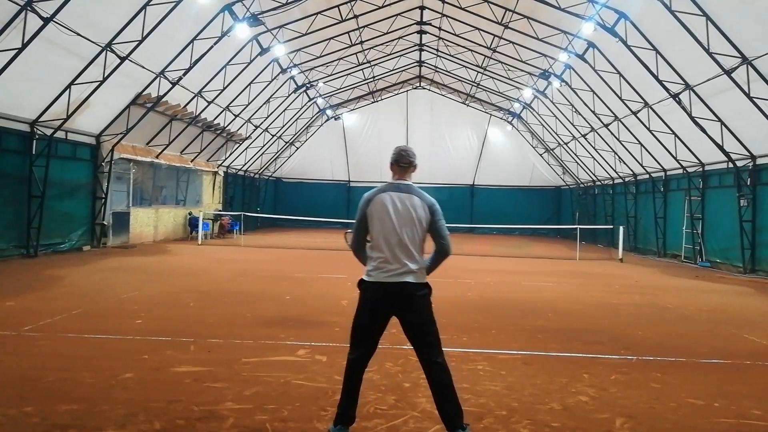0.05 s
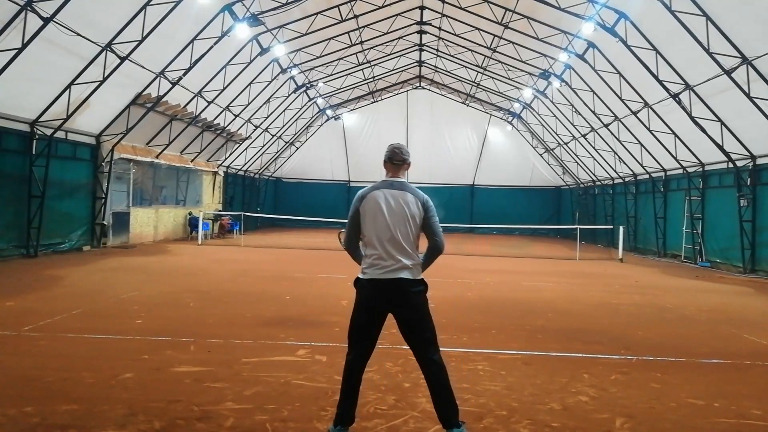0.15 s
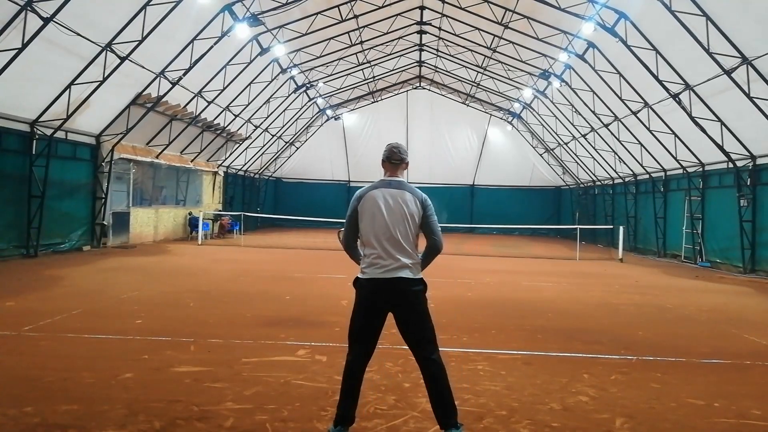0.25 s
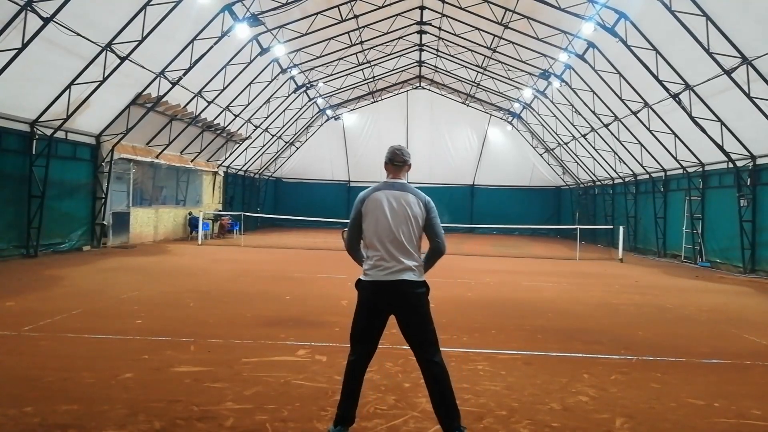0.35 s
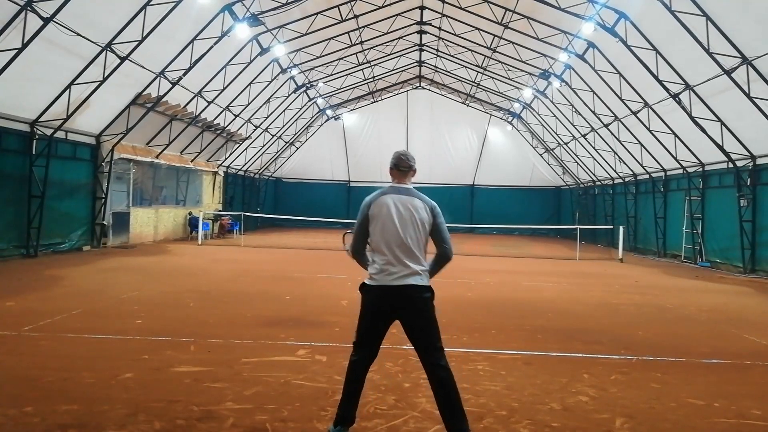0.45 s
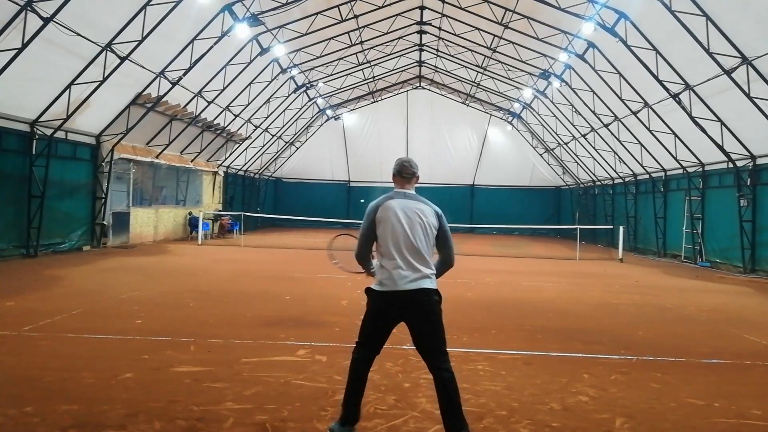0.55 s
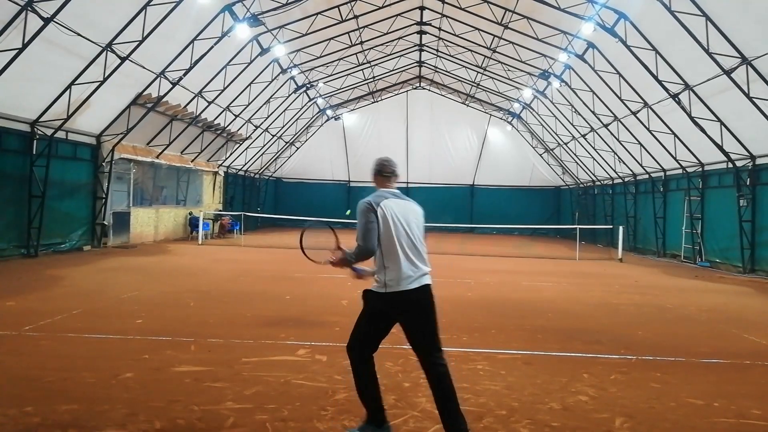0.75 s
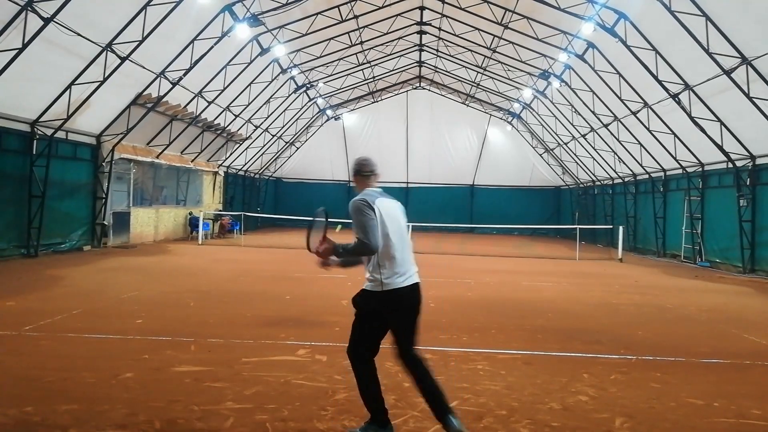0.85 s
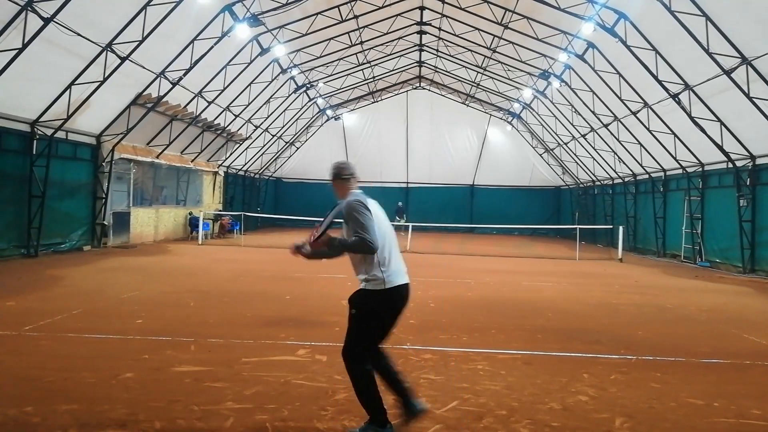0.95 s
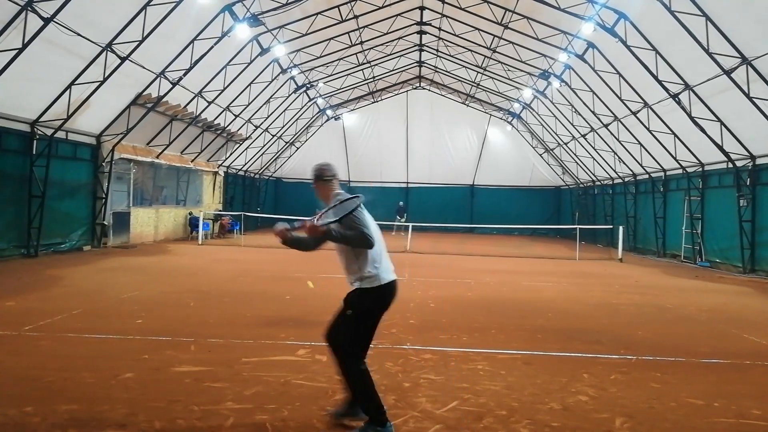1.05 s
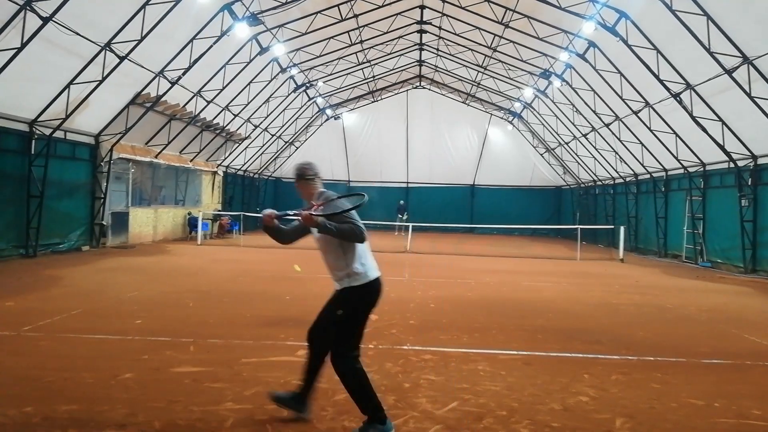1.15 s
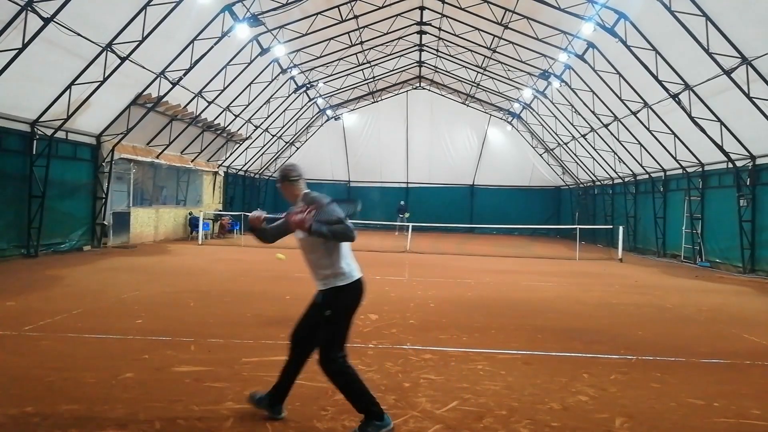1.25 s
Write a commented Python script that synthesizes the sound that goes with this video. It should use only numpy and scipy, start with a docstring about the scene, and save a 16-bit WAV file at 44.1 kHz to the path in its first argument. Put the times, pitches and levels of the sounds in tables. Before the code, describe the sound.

Tennis ball hit across a reverberant hall, long ringing echo, then shoe scuffs and a bounce

```python
"""Indoor clay tennis court under an arched roof, over a steady bed of humming lights and filtered-noise air.
Soft footfalls pad by as noise bursts, then the far player strikes the ball: damped modes give a dull pock,
and coloured noise bursts give the boom and the flutter of brighter roof echoes. A long wash of decaying
noise follows, with lingering notes, and the end wall feeds it once more. The near player's shoes scuff
the clay in noise swells, the ball bounces with a modal pop, and grains crack as a swept tone squeaks."""
import sys
import numpy as np
from scipy import signal
from scipy.fft import rfft, irfft, next_fast_len
from scipy.io import wavfile
from scipy.ndimage import map_coordinates

SR = 44100
rng = np.random.default_rng(int(sys.argv[2]) if len(sys.argv) > 2 else 0)


def to_wav(s):
    """Save 16-bit WAV."""
    ch = np.atleast_2d(s).T  # columns
    pcm = np.round(np.clip(ch, -1, 1) * 32767)  # PCM
    wavfile.write(sys.argv[1], SR, pcm.astype(np.int16))


N = 57330  # length in samples

# All spectra below give relative colour; each noise is levelled to rms 1 before its own gain.

# ball on the strings: pitch_hz, level_db, t60_s, rise_s
RACKET_MODES = [(212.3, -9.5, 0.15, 0.0091), (333.4, -2, 0.049, 0.0016), (630, 6.5, 0.013, .0012),
                (1124, 0, 0.025, 0.0031)]
# the pock, direct and off ground, walls and roof: start_s, level_db, tilt_db_per_octave, left_minus_right_db
POCK_ARRIVALS = [(0.2347, -19, 5, 0), (0.2458, -15, 4, 7.5), (0.2498, -21, 13.5, -4),
                 (0.2563, -23.5, -2.5, -4), (0.2735, -19, -4, -1), (0.2806, -16, 0.5, -1),
                 (0.3066, -19.5, 1, 3), (0.3141, -21, -3, 2), (0.3511, -26, 10.5, 0)]
PIVOT_HZ = 580  # the tilt turns about this pitch
# scattered roof echoes of the strike: start_s, thump_level_db, crack_level_db, spread_s
ROOF_ECHOES = [(0.232, -34.5, -49.5, 0.0093), (0.2417, -26, -31, 0.0036), (0.252, -28, -35.5, 0.0032),
               (0.268, -28, -32, .006), (0.276, -21.5, -31.5, 0.0038), (.306, -26.5, -34, .005),
               (0.351, -35, -55, 0.0037), (0.4758, -48, -29, 0.0012), (0.517, -32.5, -55, 0.011),
               (.650, -36, -50, .005), (0.816, -38, -50, 0.0047)]
# dull part of the echoes: pitch_hz, level_db_per_hz
THUMP_COLOUR = [(60, -42), (130, -22), (200, -3), (310, -5.5), (440, 0), (680, -12), (870, 4), (1150, -2),
                (1480, -18), (3000, -59)]
# bright part of the echoes: pitch_hz, level_db_per_hz
CRACK_COLOUR = [(900, -15), (1800, -2), (2600, -0.5), (4700, 2), (5500, -8.5), (9000, -15), (15000, -45)]
# the top of the echoes, which the air soaks up on the way: pitch_hz, level_db_per_hz
SIZZLE_COLOUR = [(2500, -31), (4500, -6), (6400, -2), (7800, -7.5), (9600, 5), (11200, -8.5), (15000, -35)]
SIZZLE_DB, SIZZLE_LOSS_DB_PER_S = 3.5, 75  # level against the crack

# low boom under the roof: pitch_hz, level_db_per_hz
BOOM_COLOUR = [(70, -43), (125, -3.5), (185, -0.5), (260, 2.5), (340, -1), (480, -28), (1000, -65)]
BOOM_S, BOOM_DB, BOOM_SPREAD_S = 0.2325, -34, 0.037

# the hall's wash: pitch_hz, level_db_per_hz
WASH_COLOUR = [(70, -32), (130, -15), (200, -4), (310, 0.2), (420, 0.5), (560, -5), (900, -1), (1220, -2),
               (1450, -12), (1750, -9), (1950, -11), (3300, -11.5), (4700, -11), (5500, -17), (8000, -18),
               (9900, -15.5), (11500, -27), (15000, -52)]
# how long each pitch lasts in the hall: pitch_hz, t60_s
HALL_T60 = [(120, 2.1), (300, 2.02), (1000, 2.85), (1800, 2.64), (3000, 2.25), (5000, 1.61), (9500, 1),
            (14000, 0.73)]
# left-right likeness of every diffuse noise: pitch_hz, correlation (-1 to 1)
LIKENESS = [(90, 0.98), (220, 0.93), (400, 0.35), (700, -0.28), (1100, 0.16), (2000, 0.01), (10000, 0.019)]
WASH_S, WASH_DB, WASH_RISE_S = 0.2523, -24.5, 0.011
END_WALL_S, END_WALL_DB, END_WALL_WIDTH_S = 0.624, 3, 0.096  # the far end's return lifts the wash

# narrow ringing band that the roof sends back: pitch_hz, level_db_per_hz
SING_COLOUR = [(1450, -40), (1660, -2.5), (1720, 2.5), (1765, -1), (1820, -3), (2050, -52)]
SING_S, SING_DB, SING_T60_S = 0.267, -36, 3.2
SING_FLARE_DB, SING_FLARE_S = -30.5, 0.0081  # opening flare: peak level, spread

# notes that hang in the hall after the strike: pitch_hz, level_db
HANGING_NOTES = [(291, -44.5), (372, -44.5), (419, -46), (523, -46), (608, -47.5), (917, -53), (1178, -54),
                 (1756, -43)]
HANGING_T60_S, HANGING_KNOTS_PER_S = 2.06, 16.1  # decay, pace of the beating

# the ball on the clay, then its roof echo: start_s, level_db, tilt_db_per_octave
BOUNCES = [(1.1193, -23.5, 0), (1.152, -28, -4)]
# the hollow ball: pitch_hz, level_db, t60_s, rise_s
BALL_MODES = [(187, -4.5, 0.02, 0.00083), (560, -5, 0.013, 0.00069), (1226, 2, 0.02, 0.0015)]
# scattered noise swells around the bounce: start_s, level_db, spread_s
BOUNCE_ECHOES = [(1.4, -36, 0.011), (1.044, -45, 0.092)]
# their colour: pitch_hz, level_db_per_hz
BOUNCE_COLOUR = [(80, -18), (170, -2), (400, -7), (900, 2.5), (1250, 4), (1550, -8), (3500, -6),
                 (6000, -43), (14000, -34)]

# shoes sliding on clay: middle_s, level_db, half_length_s
SCUFFS = [(0.23, -57.5, 0.068), (0.675, -43.5, 0.026), (0.828, -44, 0.023), (0.91, -45.5, 0.016),
          (0.968, -51, 0.019), (1.062, -43.5, 0.029), (1.153, -44, 0.026), (1.213, -44.5, 0.023),
          (1.277, -47.5, 0.025)]
# colour of the slides: pitch_hz, level_db_per_hz
CLAY_COLOUR = [(400, 4), (1500, 9), (4000, 4.5), (5800, 0), (7500, -3), (9800, 2), (11500, -11),
               (15000, -25)]
GRAIN_SCATTER_DB = 3  # random level from sample to sample
# single grains cracking under a sole: start_s, level_db
GRIT = [(.8612, -37.5), (0.914, -37.5), (0.982, -46.5), (1.122, -42), (1.21, -40), (1.227, -39),
        (1.2409, -35.5), (1.2542, -33.5), (1.2585, -44), (1.262, -39.5)]
# colour of the cracks: pitch_hz, level_db_per_hz
GRIT_COLOUR = [(2000, -1), (5000, -8), (6500, -4.5), (9800, 3.5), (12000, -3.5), (15000, -20)]
# soft footfalls: start_s, level_db
STEPS = [(0.027, -46), (.135, -48), (.205, -44)]
# colour of the footfalls: pitch_hz, level_db_per_hz
STEP_COLOUR = [(60, -18), (180, 14), (320, -3), (480, -12), (1500, -42)]
GRIT_SPREAD_S, STEP_SPREAD_S = 0.00066, 0.0071
SQUEAK_S, SQUEAK_DB, SQUEAK_HALF_S = 1.2255, -37, 0.005  # middle, peak level, half length
SQUEAK_HZ, SQUEAK_HZ_PER_S = 1300, 2700  # pitch at the middle; a pivoting sole chirps upward

# hum of the hall lights: pitch_hz, level_db
HUM = [(99.5, -52.5), (187, -60.5), (199.5, -56), (289, -59.5)]
HUM_DRIFT_RAD, HUM_WAVER_DB = 0.25, 1.75
# quiet air of the hall: pitch_hz, level_db_per_hz
AIR_COLOUR = [(20, -16), (60, -1), (130, -5.5), (200, -2), (330, -8.5), (500, -13.5), (800, -12),
              (1200, -9), (1450, -9), (1750, -11), (2200, -16.5), (4000, -22.5), (6500, -30), (10000, -25),
              (15000, -42)]
AIR_DB = -49

# colour difference of the two microphones: pitch_hz, left_minus_right_db
MIC_TILT = [(150, 0), (500, -0.5), (1200, 0), (2500, -1), (5000, 0.5), (9000, 3), (13000, -1)]
TOP_HZ = 15800  # band limit


def amp(db):
    """Decibels to gain."""
    return 10 ** (np.asarray(db) / 20)


def unit(x):
    """Level a sound to rms 1."""
    return x / np.sqrt(np.mean(x ** 2) + 1e-20)


def along(points, hz):
    """Read a curve of (pitch_hz, value) points on a log pitch axis."""
    f, v = np.transpose(points)
    return np.interp(np.log(hz + 1), np.log(f + 1), v)


def since(s):
    """Seconds after a moment, zero before it."""
    return np.maximum(np.arange(N) / SR - s, 0)


def wobble(rate):
    """A smooth random curve, rate knots a second."""
    knots = rng.standard_normal(int(N * rate / SR) + 4)
    return map_coordinates(knots, [np.arange(N) * rate / SR])


def filtered(x, response):
    """Shape a sound by a response of frequency."""
    m = next_fast_len(N + SR // 2)
    return irfft(rfft(x, m) * response(np.fft.rfftfreq(m, 1 / SR)), m)[..., :N]


def diffuse(spectrum, grain=1):
    """Coloured stereo noise of rms 1, alike in the bass and mostly unrelated above."""
    def mid_side_gains(hz):
        # half the angle whose cosine is the left-right correlation
        turn = np.arccos(np.clip(along(LIKENESS, hz), -1, 1)) / 2
        return amp(along(spectrum, hz)) * [np.cos(turn), np.sin(turn)]

    mid, side = filtered(grain * rng.standard_normal((2, N)), mid_side_gains)
    return unit(np.array([mid + side, mid - side]))


def panned(x, left_db):
    """Lean a sound to the left by a level difference."""
    return x * amp(left_db / 2 * np.array([[1], [-1]]))


def burst(s, db, spread):
    """Envelope that peaks one spread after its start and dies away."""
    u = since(s) / spread
    return amp(db) * u * np.exp(1 - u)


def ring(s, modes, tilt_db):
    """Damped modes struck at a moment, made brighter or duller by a tilt per octave."""
    t = since(s)
    total = 0
    for hz, db, t60, rise in modes:
        fall = amp(db + tilt_db * np.log2(hz / PIVOT_HZ) - 60 * t / t60)
        total = total + fall * (1 - np.exp(-t / rise)) * np.sin(2 * np.pi * hz * t)
    return total


def strike():
    """The dull pock and its first reflections, among brighter echoes scattered by the roof trusses."""
    pock = sum(panned(amp(db) * ring(s, RACKET_MODES, tilt_db), left_db)
               for s, db, tilt_db, left_db in POCK_ARRIVALS)
    # overlapping echoes add by power
    thump_envelope = sum(burst(s, db, spread) ** 2 for s, db, _, spread in ROOF_ECHOES) ** .5
    crack_envelope = sum(burst(s, db, spread) ** 2 for s, _, db, spread in ROOF_ECHOES) ** .5
    thump = thump_envelope * diffuse(THUMP_COLOUR)
    # the later the echo, the more treble the air has taken
    sizzle_gain = amp(SIZZLE_DB - SIZZLE_LOSS_DB_PER_S * since(POCK_ARRIVALS[0][0]))
    sizzle = panned(sizzle_gain * diffuse(SIZZLE_COLOUR), left_db=0.5)
    crack = crack_envelope * (diffuse(CRACK_COLOUR) + sizzle)
    return pock + panned(thump, left_db=-0.5) + crack


def boom():
    """The bass of the strike swells briefly under the roof."""
    return burst(BOOM_S, BOOM_DB, BOOM_SPREAD_S) * diffuse(BOOM_COLOUR)


def wash():
    """The strike's reverberation: high treble dies first, and the end wall sends back a swell."""
    hz, t, bins = signal.stft(diffuse(WASH_COLOUR), SR, nperseg=512)
    fall = amp(-60 * np.maximum(t - WASH_S, 0) / along(HALL_T60, hz)[:, None])
    tail = signal.istft(bins * fall, SR, nperseg=512)[1][:, :N]
    swell_db = END_WALL_DB * np.exp(-((since(0) - END_WALL_S) / END_WALL_WIDTH_S) ** 2)
    rise = 1 - np.exp(-since(WASH_S) / WASH_RISE_S)
    return panned(tail * amp(WASH_DB + swell_db) * rise, left_db=-0.85)


def sing():
    """A narrow band flares with the first roof echo and rings on through the hall."""
    t = since(SING_S)
    lasting = amp(SING_DB - 60 * t / SING_T60_S) * (1 - np.exp(-t / WASH_RISE_S))
    flare = burst(SING_S, SING_FLARE_DB, SING_FLARE_S)
    return (lasting + flare) * diffuse(SING_COLOUR)


def beating(hz):
    """A tone of rms 1 whose level and phase wander, as when many echoes of one note overlap."""
    phase = 2 * np.pi * hz * since(0)
    in_phase = wobble(HANGING_KNOTS_PER_S) * np.cos(phase)
    quadrature = wobble(HANGING_KNOTS_PER_S) * np.sin(phase)
    return unit(in_phase + quadrature)


def hanging():
    """The strike's strongest notes linger, beating slowly and differently on each side."""
    t = since(WASH_S)
    mid = sum(amp(db) * beating(hz) for hz, db in HANGING_NOTES)
    side = .5 * sum(amp(db) * beating(hz) for hz, db in HANGING_NOTES)
    pair = mid + side * np.array([[1], [-1]])
    return pair * amp(-60 * t / HANGING_T60_S) * (1 - np.exp(-t / WASH_RISE_S))


def bounce():
    """The hollow ball pops on the clay as damped modes, and the hall answers in diffuse noise."""
    pop = sum(amp(db) * ring(s, BALL_MODES, tilt_db) for s, db, tilt_db in BOUNCES)
    answer = sum(burst(s, db, spread) for s, db, spread in BOUNCE_ECHOES)
    return answer * diffuse(BOUNCE_COLOUR) - pop  # the pop's first push is downward


def shoes():
    """Soles pad and grind the clay in soft swells of rough noise; a few grains crack."""
    pads = sum(burst(s, db, STEP_SPREAD_S) for s, db in STEPS) * diffuse(STEP_COLOUR)
    slide = sum(amp(db) * np.exp(-((since(0) - s) / half) ** 2 / 2) for s, db, half in SCUFFS)
    grain = amp(GRAIN_SCATTER_DB * rng.standard_normal(N))
    cracks = sum(burst(s, db, GRIT_SPREAD_S) for s, db in GRIT)
    return pads + slide * diffuse(CLAY_COLOUR, grain) + panned(cracks * diffuse(GRIT_COLOUR), left_db=2)


def squeak():
    """A faint, short rising chirp of a sole: a swept sine in a bell-shaped envelope."""
    t = since(0) - SQUEAK_S
    cycles = (SQUEAK_HZ + SQUEAK_HZ_PER_S * t / 2) * t
    return amp(SQUEAK_DB) * np.exp(-(t / SQUEAK_HALF_S) ** 2 / 2) * np.sin(2 * np.pi * cycles)


def hall():
    """A faint electrical hum, wavering in level and phase, over the quiet air."""
    hum = 0
    for hz, db in HUM:
        level = amp(db + HUM_WAVER_DB * wobble(8.6)) * np.sqrt(2)  # the table's levels are rms
        hum = hum + level * np.sin(2 * np.pi * hz * since(0) + HUM_DRIFT_RAD * wobble(6.3))
    return hum + amp(AIR_DB) * diffuse(AIR_COLOUR)


def scene():
    """The strike and the hall's answer, the bounce, the shoes and the quiet hall."""
    strike_in_hall = strike() + boom() + wash() + sing() + hanging()
    return strike_in_hall + bounce() + shoes() + squeak() + hall()


def record(dry):
    """The two microphones differ a little in colour; nothing is kept above the band limit."""
    return filtered(dry, lambda hz: panned(hz < TOP_HZ, along(MIC_TILT, hz)))


dry = scene()
out = record(dry)
to_wav(out)
```